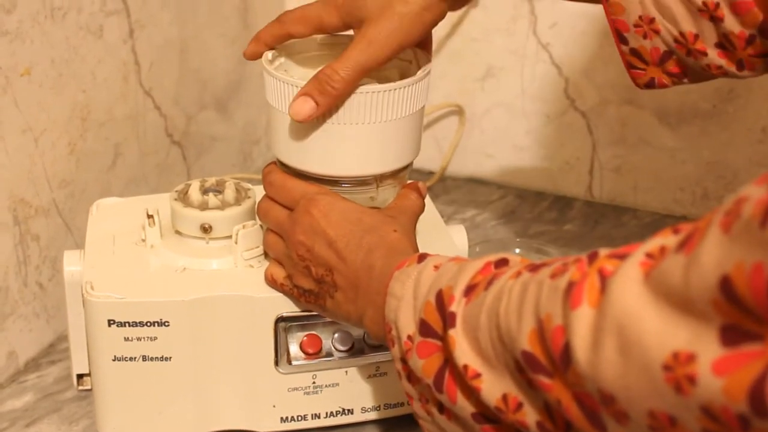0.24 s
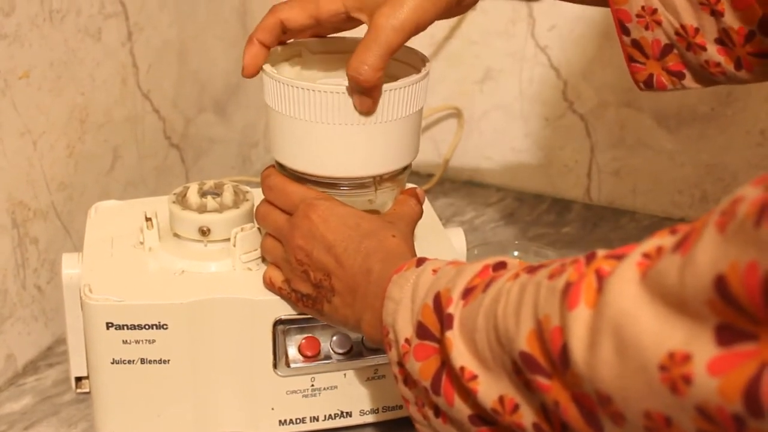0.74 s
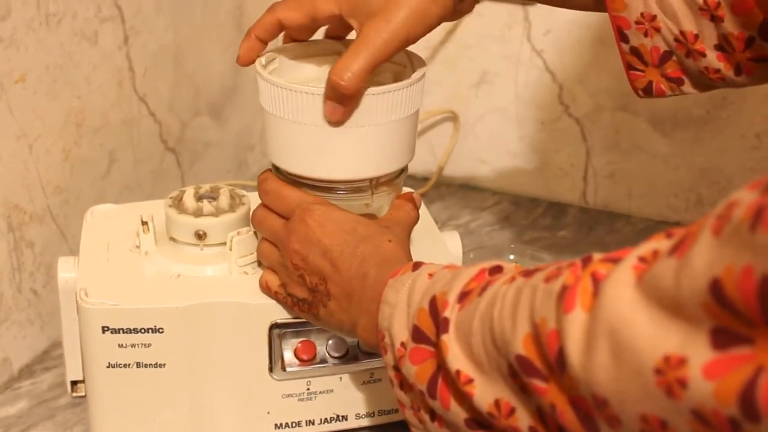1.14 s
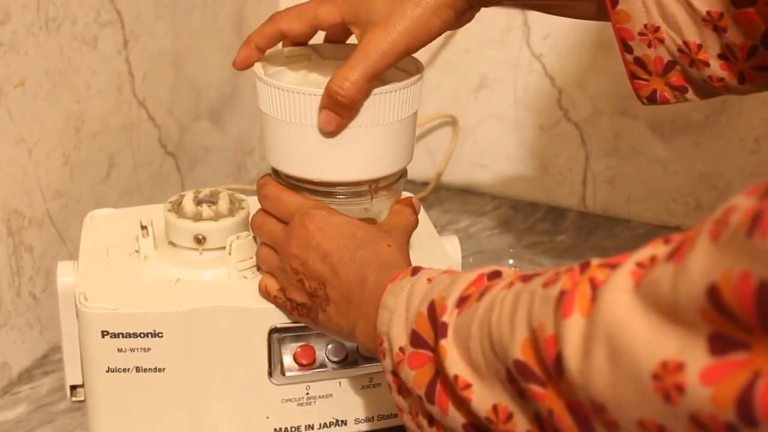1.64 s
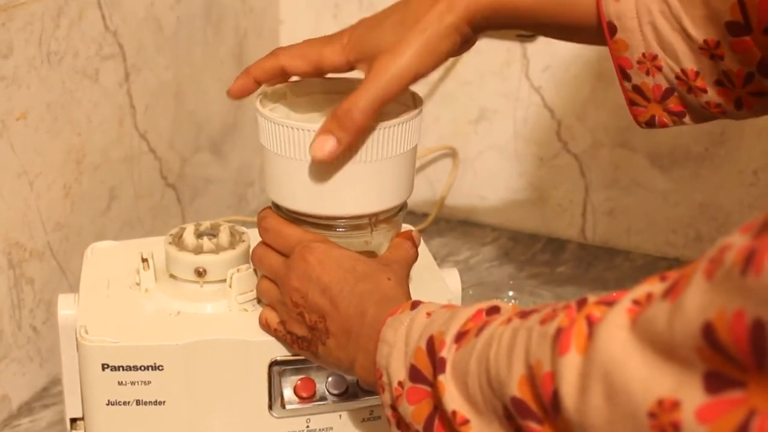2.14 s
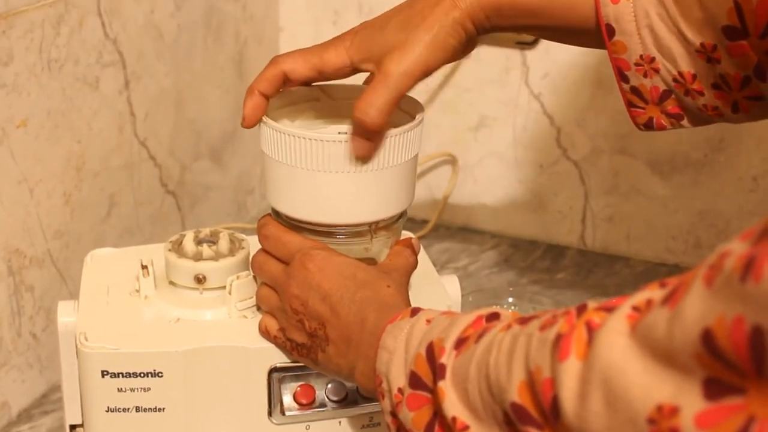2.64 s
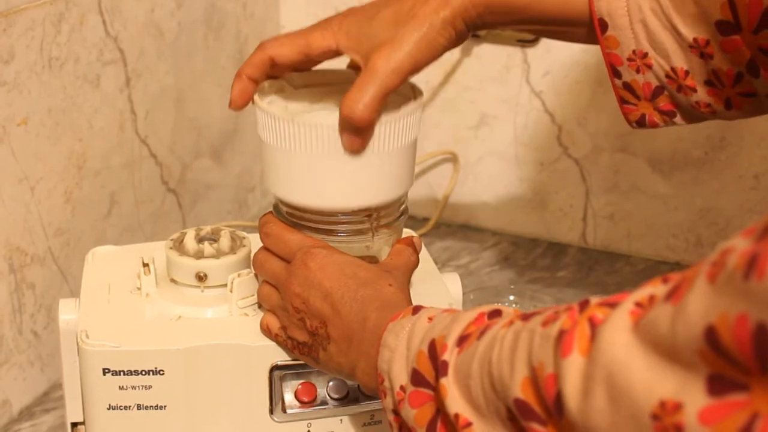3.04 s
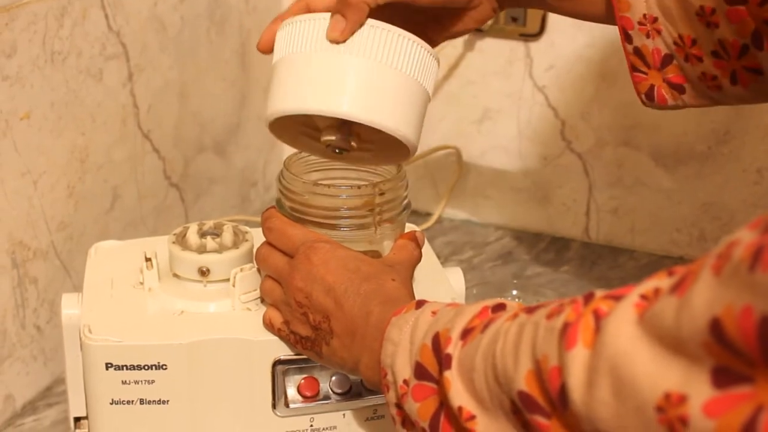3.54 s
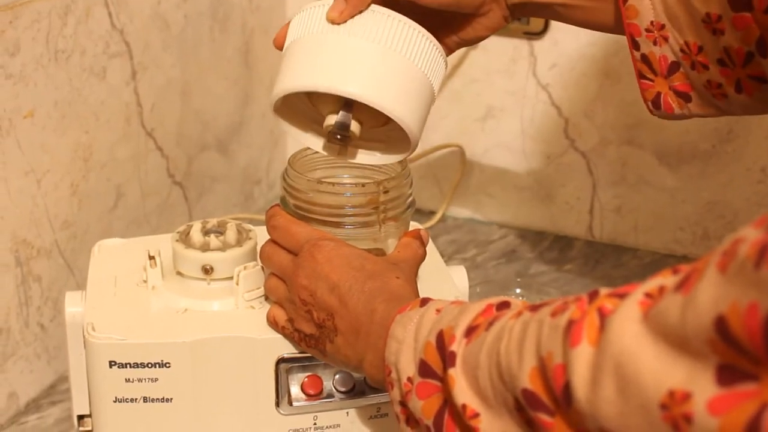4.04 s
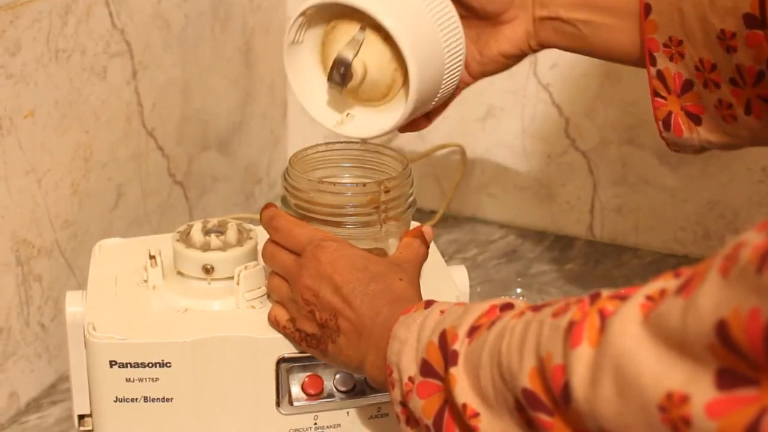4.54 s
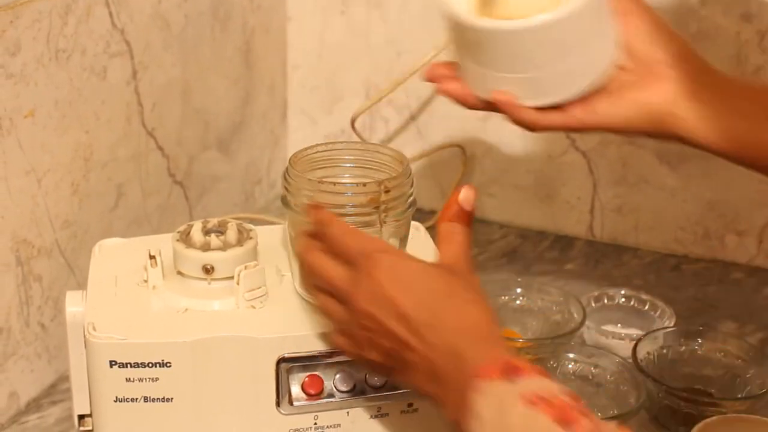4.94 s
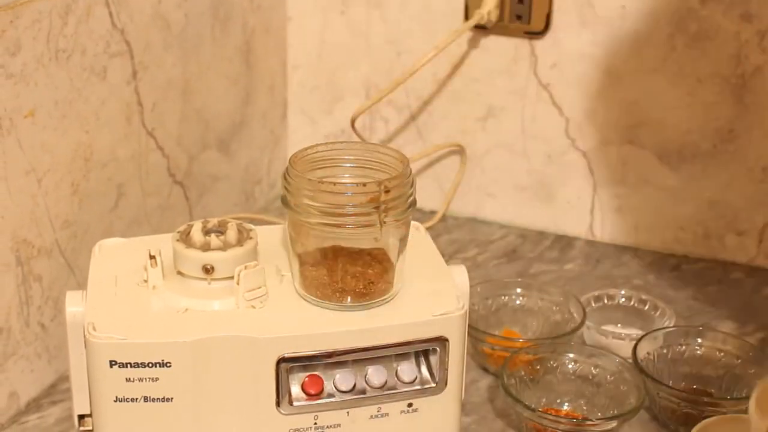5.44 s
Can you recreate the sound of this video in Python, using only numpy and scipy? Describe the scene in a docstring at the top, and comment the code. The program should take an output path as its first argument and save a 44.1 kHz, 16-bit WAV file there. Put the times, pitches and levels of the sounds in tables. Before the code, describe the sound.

Close stereo view in a small, hard, reverberant kitchen. A cricket chirps quietly throughout, about seven short high pulses a second near 5.4 kHz, over low room noise, faint hum and thin hiss. From 0 to 0.5 s a plastic lid on a glass jar gives small hollow knocks with low thumps and a gritty scrape at 0.1 s. Pairs and clusters of clacks follow at 0.8, 1.1-1.2 (strong), 1.4, 1.7, 2.1, 2.4 and 2.7 s, each with a softer rock back; brief rubs come at 0.5, 1.15 and 2.7, and a rim strike at 1.45. A loud flurry at 3.0-3.2 s frees the lid, leaving a thin glass ring. Four solid, ringing raps on the rim follow at 3.66, 3.85 (loudest, doubled), 4.04 and 4.24 s. Light ticks fall between 4.86 and 5.15, clearest at 4.94. Near 5.6 s a sleeve rubs very faintly, leaving cricket and room.

```python
"""A ribbed plastic grinder lid is unscrewed from a glass jar in a hard-walled kitchen, heard in stereo.
It knocks and scrapes in its thread at each new grip, and strikes the rim once on the way; then it comes
free and is rapped four times on the rim. The hand lets go of the jar and a sleeve rubs faintly.
Contacts are short forces that drive the modes of lid or jar, in the room's reverberation.
A cricket, a train of ticks ringing a wing, chirps steadily in the room over noise, hum and hiss."""
import sys
import numpy as np
from scipy import signal
from scipy.fft import rfft, irfft
from scipy.io import wavfile
from scipy.ndimage import uniform_filter1d

SR = 44100
rng = np.random.default_rng(int(sys.argv[2]) if len(sys.argv) > 2 else 0)


def waveform_to_disk(signal):
    """Save audio, clipped to [-1, 1], as 16-bit WAV at the path in sys.argv[1]."""
    frames = np.transpose(np.atleast_2d(signal))
    scaled = np.clip(frames, -1, 1) * 32767
    samples = np.round(scaled).astype(np.int16)
    wavfile.write(sys.argv[1], SR, samples)


N = 250488

# Modes of the lid closed over the jar. Each row: frequency in Hz, relative level in dB, t60 in seconds.
LID_MODES = [(148, -15, 1), (282.4, -12, 0.73), (328.4, -10.5, 0.24), (364.3, -2.5, 0.23), (375, 1, 0.061),
             (398, -10.5, 0.48), (433.4, -9, 1), (472, -10, 0.59), (688.4, -13, 0.48), (788, -5.5, 0.39),
             (1050, -10.5, 0.74), (1107, -7.5, 0.35), (1165, -10, 0.55), (1254, -10, 0.17),
             (2287, -10.5, 0.18), (2368, -18, 0.15), (3090, -20.5, 0.27), (3270, -23, 0.28)]


def undb(db):
    """Decibels to gain."""
    return 10 ** (np.asarray(db) / 20)


def unit(x):
    """Scale to unit energy per channel."""
    return x / np.sqrt(np.mean(np.sum(x ** 2, axis=-1)) + 1e-18)


def along(points, hz):
    """Read (Hz, value) points on a log-frequency axis."""
    point_hz, value = np.transpose(points)
    return np.interp(np.log(np.maximum(hz, 1)), np.log(point_hz), value)


def tint(x, points):
    """Weight the spectrum of a sound by (Hz, dB) points."""
    size = x.shape[-1]
    gain = undb(along(points, np.fft.rfftfreq(size, 1 / SR)))
    return irfft(rfft(x) * gain, size)


def response(points, size=2048):
    """Causal (minimum-phase) impulse response with the spectrum of (Hz, dB) points."""
    gain = undb(along(points, np.fft.rfftfreq(size, 1 / SR)))
    cepstrum = irfft(np.log(gain))
    # fold the cepstrum onto positive time, so the response starts at once
    cepstrum[1:size // 2] *= 2
    cepstrum[size // 2 + 1:] = 0
    return irfft(np.exp(rfft(cepstrum)))


def through(x, ir):
    """Pass a sound through a response, one row per channel."""
    return signal.fftconvolve(np.atleast_2d(x), np.atleast_2d(ir), axes=-1)[:, :N]


def add(track, s, x):
    """Mix x into the track from time s."""
    start = max(int(s * SR), 0)
    part = track[..., start:start + x.shape[-1]]
    part += x[..., :part.shape[-1]]


def ringing_mode(hz, t60, phase=0.0):
    """One second of a sine that falls by 60 dB in t60, at unit energy."""
    t = np.arange(SR) / SR
    return unit(np.sin(2 * np.pi * (hz * t + phase)) * np.exp(-np.log(1000) * t / t60))


def body(colour, modes, ring_db, room, build_s):
    """A broad crack carried by the room, and modes that build up and ring on."""
    t = np.arange(SR) / SR
    ring = sum(undb(db) * ringing_mode(hz, t60, phase=rng.random()) for hz, db, t60 in modes)
    ring = unit(ring * (1 - np.exp(-t / build_s)))
    crack = unit(through(response(colour), room)[:, :len(t)])
    return unit(crack + undb(ring_db) * ring)


def slips(size, rate, spread_db):
    """Tiny slips of uneven force at random moments, rate per second."""
    when, force = rng.random(size), rng.standard_normal(size)
    sign = rng.choice([-1, 1], size)
    return (when < rate / SR) * sign * undb(spread_db * force)


def contact_force(rattle_s, chatter_db, chatter_hz, push_hz):
    """A push, low-passed at push_hz, then high-passed chatter as the faces grind."""
    t = np.arange(SR // 10) / SR
    age = t / rattle_s
    chatter = unit(slips(len(t), rate=2900, spread_db=2.5) * np.sqrt(age) * np.exp(-age))
    chatter = signal.sosfilt(signal.butter(2, chatter_hz, "high", fs=SR, output="sos"), chatter)
    push = signal.sosfilt(signal.butter(1, push_hz, fs=SR, output="sos"), 1. * (t == 0))
    return undb(chatter_db) * chatter + push


def blows(table, ringing, thump_db, chatter_db, chatter_hz, push_hz, favour_db, detune):
    """Contact forces strike a ringing body; short ones clack harder, and the grip retunes it a little."""
    plain_rattle_s, clack_db_per_halving = 0.0034, 3.5
    out = np.zeros((2, N))
    taps = np.arange(SR * 3 // 4)
    for row, low_db in zip(table, np.broadcast_to(thump_db, len(table))):
        s, db, rattle_s, bright_db, favoured_hz = row
        force = contact_force(rattle_s, chatter_db, chatter_hz, push_hz)
        # the point of contact decides which modes are driven hardest
        force += undb(favour_db) * signal.lfilter(*signal.iirpeak(favoured_hz, 6, fs=SR), force)
        clack_db = clack_db_per_halving * np.log2(plain_rattle_s / rattle_s)
        hardness = response([(40, -5.5), (140, low_db), (380, -3.5), (1100, clack_db), (2800, bright_db)])
        pitch = 1 + detune * rng.standard_normal()
        held = [np.interp(taps * pitch, np.arange(len(x)), x) for x in ringing]
        add(out, s, undb(db) * through(through(force, hardness), held))
    return out


def rocking(rows):
    """The lid rocks back once after each knock, softer and duller."""
    delays = rng.uniform(.015, .05, len(rows))  # seconds
    return [(s + delay, db - 10, 0.0077, bright_db - 4.5, hz)  # the third is the rattle in seconds
            for (s, db, _, bright_db, hz), delay in zip(rows, delays)]


def lid_knocks(room):
    """The lid knocks in its thread and rocks back, ringing the closed jar and thumping the base."""
    # Knocks. Each row: start in seconds, level in dB, rattle in seconds, brightness in dB, favoured Hz.
    knock_rows = [(.003, -14, 0.0058, 0, 317), (.062, -9.5, .0025, 1.5, 368), (.086, -7, 0.0042, 5.5, 322),
                  (.196, -7, 0.00082, 3.5, 310), (.403, -4, 0.0016, -4, 360), (.472, -4.5, 0.0067, 6, 324),
                  (.799, -2, .004, -1, 340), (.848, -1.5, 0.0095, -6, 306), (1.080, 2.5, 0.003, -5, 353),
                  (1.189, 7, 0.0035, 1, 388), (1.385, -10, 0.0032, 7, 380), (1.427, -7.5, 0.013, 8, 380),
                  (1.636, -5, 0.021, -3.5, 373), (1.696, 0, 0.0056, -4, 384), (1.751, 0, 0.011, 3.5, 380),
                  (2.068, 1, 0.0059, 3, 482), (2.079, -2, 0.0024, 6, 494), (2.131, 2, .011, 7, 363),
                  (2.306, -3.5, 0.017, 0.5, 420), (2.354, 0.5, 0.012, -4.5, 420),
                  (2.419, -0.5, 0.0081, 6.5, 444), (2.440, -3, 0.0052, -3, 424),
                  (2.674, 4.5, 0.0026, 4.5, 410), (2.727, 0.5, 0.0036, 3.5, 358),
                  (2.973, 6, 0.0016, 0, 386), (3.092, 2.5, 0.0063, 7, 370), (3.142, 4.5, 0.0067, 3, 503),
                  (3.201, 0, 0.0054, 10, 356)]
    # Thump passed into the base, strong at the first grip and as the lid lifts.
    # Each row: time in seconds, level in dB.
    lid_thump = [(.09, 14), (.4, 7.5), (.8, 1), (1.19, -10), (1.75, -3.5), (2.07, 4.5), (2.42, 2),
                 (3.0, -12.5), (3.15, 12)]
    # Broad colour of the closed lid. Each row: frequency in Hz, level in dB.
    lid_colour = [(60, -42.5), (110, -15), (150, -9), (260, 0), (390, 7.5), (600, 0.5), (1150, -1),
                  (1800, -9.5), (2500, -9.5), (4000, -20), (7500, -27), (15000, -46)]
    lid = body(lid_colour, LID_MODES, ring_db=-0.5, room=room, build_s=0.002)
    twists = [*knock_rows, *rocking(knock_rows)]
    thumps = np.interp([row[0] for row in twists], *np.transpose(lid_thump))
    return blows(twists, lid, thump_db=thumps, chatter_db=-2, chatter_hz=1460, push_hz=3880,
                 favour_db=1.5, detune=0.012)


def scrapes(room):
    """Plastic rubs on the thread, and at last a sleeve, in swells of dense slips."""
    # Rubs. Each row: middle in seconds, length in seconds, level in dB, brightness in dB.
    scrape_rows = [(0.136, .1, 3.5, -2), (0.501, 0.073, -5, -4), (1.152, 0.058, -7.5, 2),
                   (2.713, 0.047, -1.5, -1.5), (3.135, .05, 0.5, 0), (5.634, 0.33, -31.5, 21)]
    # Broad colour of the rubs. Each row: frequency in Hz, level in dB.
    scrape_colour = [(50, -23), (140, -5.5), (350, 10), (600, -1), (1150, -0.5), (2500, 1.5), (4200, -2.5),
                     (8000, -12), (11000, -19.5), (15000, -33)]
    force = np.zeros(N)
    t = np.arange(SR // 2) / SR
    for s, length, db, bright_db in scrape_rows:
        swell = np.sin(np.pi * np.minimum(t / length, 1)) ** 2
        rub = unit(slips(len(t), rate=2500, spread_db=7.5) * swell)
        tilt = response([(500, -bright_db), (4000, bright_db)])
        add(force, s - length / 2, undb(db) * through(rub, tilt)[0])
    return through(force, body(scrape_colour, LID_MODES, ring_db=-4.5, room=room, build_s=0.0012))


def rim_raps(room):
    """The lid strikes the glass rim, ringing the open jar and shaking the base below."""
    # Strikes. Each row: start in seconds, level in dB, rattle in seconds, brightness in dB, favoured Hz.
    rap_rows = [(1.447, 6.8, 0.0037, -2.5, 298), (3.658, 3.9, 0.0032, -1, 293),
                (3.845, 9.36, 0.0061, 2, 267), (3.860, 5.4, 0.0016, -3.5, 298),
                (4.035, 7.35, 0.0057, -0.5, 254), (4.242, 5.8, .0041, -3.5, 460)]
    # Modes of the open jar on its hollow base. Each row: frequency in Hz, level in dB, t60 in seconds.
    jar_modes = [(126.5, -14, 0.8), (146, -9, 0.76), (178, -11, 0.72), (278.2, -3.5, 0.68),
                 (296, -2.5, 0.58), (357, -2, 0.63), (468.5, -1, 0.13), (574, -4, .22), (714, -2.5, 0.3),
                 (1147, -11, 0.43), (1240, -5.5, 0.19), (1656, -2, 0.092), (1814, -31, 0.25),
                 (2270, -5, 0.25), (3256, -8, 0.3)]
    # Broad colour of the open jar. Each row: frequency in Hz, level in dB.
    jar_colour = [(50, -32), (90, -15.5), (125, -10.5), (300, 1), (700, -2), (1500, -5.5), (3200, -8),
                  (4200, -13), (7000, -17.5), (11000, -25.5), (15500, -38)]
    jar = body(jar_colour, jar_modes, ring_db=-4.0, room=room, build_s=0.005)
    return blows(rap_rows, jar, thump_db=3, chatter_db=2.5, chatter_hz=465, push_hz=1010,
                 favour_db=6, detune=0.00722)


def pings():
    """The glass rings after a touch, one mode each time: first long, then short."""
    # Touches. Each row: start in seconds, frequency in Hz, level in dB, t60 in seconds.
    ping_rows = [(3.201, 2900, -13.5, .55), (4.038, 2270, -2, 0.14)]
    glass = np.zeros(N)
    for s, hz, db, t60 in ping_rows:
        add(glass, s, undb(db) * ringing_mode(hz, t60))
    return glass


def settling(room):
    """The jar ticks as the hand leaves it: small blows coloured by its foot and the room."""
    # Ticks. Each row: start in seconds, level in dB, rattle in seconds, brightness in dB, favoured Hz.
    tick_rows = [(4.857, -27.5, .004, -1, 1900), (4.938, -5, 0.0053, 1, 1420),
                 (5.024, -20.5, 0.0019, -0.72, 1170), (5.153, -22, 0.0046, -2, 1830)]
    # Broad colour of the foot. Each row: frequency in Hz, level in dB.
    tick_colour = [(70, -35), (250, 3.5), (700, 1.5), (1250, 1), (1900, 4), (2800, -4.5), (4500, -12),
                   (9000, -18), (15000, -40)]
    foot = unit(through(response(tick_colour), room))
    return blows(tick_rows, foot, thump_db=-9, chatter_db=-4.5, chatter_hz=800, push_hz=2480,
                 favour_db=1.0, detune=0.0316)


def off_centre(pair):
    """The jar stands a little off centre: its sound reaches the right microphone later."""
    lag_s = 1.5e-5  # a fraction of a sample, so turn the phase instead
    turn = np.exp(-2j * np.pi * np.fft.rfftfreq(N, 1 / SR) * lag_s)
    return np.array([pair[0], irfft(rfft(pair[1]) * turn, N)])


def cricket(level_db=-46.0, length_s=0.079, catch_hz=300, scatter_db=0.5, jitter=.25, sag_hz=120, grow_db=4.5):
    """The file catches in uneven ticks that ring the wing; each chirp swells late and sags in pitch."""
    # Resonance of the wing. Each row: frequency in Hz, level in dB.
    wing = [(2500, -74), (4700, -22.5), (5100, -7.5), (5420, 7), (5750, -0.5), (6120, -11.5), (6400, -34),
            (9000, -65)]
    first_chirp_s, period_s, chirp_scatter_s = -.035, .14075, 0.0022
    lead = SR // 10  # samples ahead: it is already singing at the start
    ticks = np.zeros((2, N + 2 * lead))  # wing open, wing closed
    for beat in np.arange(first_chirp_s, N / SR - length_s / 2, period_s):
        s = beat + chirp_scatter_s * rng.standard_normal()
        gap, force = rng.standard_normal(size=(2, 48))
        # progress of each tick through the stroke, 0 to 1
        stroke = np.minimum(np.cumsum(np.exp(jitter * gap)) / catch_hz / length_s, 1)
        swell = np.abs(np.sin(np.pi * stroke)) ** 0.59
        swell *= undb(grow_db * stroke + scatter_db * force)
        when = lead + (s + stroke * length_s) * SR
        ticks[:, when.astype(int)] += swell * np.array([1 - stroke, stroke])
    song = 0
    for x, shift in zip(ticks, (sag_hz / 2, -sag_hz / 2)):
        song = song + signal.fftconvolve(x, response([(hz + shift, db) for hz, db in wing]))
    # the room smears the chirps
    room = kitchen(direct_db=-8, early_db=7, early_s=.013)
    heard = signal.fftconvolve(song[None], room, axes=-1)[:, lead:lead + N]
    return undb(level_db) * np.sqrt(N) * unit(heard)


def kitchen(direct_db, early_db, early_s):
    """Direct sound, close reflections off counter and walls, then a tail that dulls as it dies."""
    # Reverberation of the kitchen. Each row: frequency in Hz, t60 in seconds.
    room_t60 = [(120, 1), (300, 0.76), (800, 0.66), (2000, 0.54), (5000, 0.45), (13000, 0.36)]
    hz, s, cells = signal.stft(diffuse(SR), SR, nperseg=256)
    decay = undb(-60 * s / along(room_t60, hz)[:, None])
    tail = signal.istft(cells * decay, SR)[1]
    t = np.arange(tail.shape[1]) / SR
    ir = unit(tail * (1 + undb(early_db) * np.exp(-t / early_s)))
    ir[:, 0] += undb(direct_db)
    return unit(even(even(ir, size=50), size=50))


def even(x, size):
    """Level out a response's broad humps and dips, keeping its fine comb."""
    spectrum = rfft(x, 2 * x.shape[1])
    power = uniform_filter1d(np.mean(np.abs(spectrum) ** 2, axis=0), size)
    return irfft(spectrum / np.sqrt(power))[:, :x.shape[1]]


def diffuse(size):
    """Noise from all sides: alike in both channels where side is weak, less related where it is strong."""
    # Side against mid. Each row: frequency in Hz, side level in dB.
    room_width = [(30, -3), (100, 0), (280, -14), (1000, -8.5), (2000, -3.5), (5000, -4.5), (12000, 1)]
    mid, side = rng.standard_normal((2, size))
    pair = mid + np.array([[1], [-1]]) * tint(side, room_width)
    # take back the power that the side signal added
    return tint(pair, [(hz, -10 * np.log10(1 + undb(db) ** 2)) for hz, db in room_width])


def background(low_db=-58, treble_db=-66, hum_hz=148, hum_db=-71):
    """Quiet room noise and a thin hiss, both tinted diffuse noise, and a faint sine hum."""
    # Room noise. Each row: frequency in Hz, relative level in dB per Hz.
    hush = [(15, -51), (25, -22), (115, -8.5), (146, -10.5), (186, -11.5), (314, -9.5), (350, -11),
            (476, -7.5), (508, -18), (660, -13), (1190, -17.5), (4600, -22), (5980, -41), (10100, -120)]
    # Hiss. Each row: frequency in Hz, relative level in dB per Hz.
    hush_treble = [(25, -60), (3000, -54), (4800, -13.5), (7500, -10.5), (11000, -12), (15500, -21)]
    low = unit(tint(diffuse(N), hush))
    treble = unit(tint(diffuse(N), hush_treble))
    hum = unit(np.sin(2 * np.pi * hum_hz * np.arange(N) / SR))
    return np.sqrt(N) * (undb(low_db) * low + undb(treble_db) * treble + undb(hum_db) * hum)


def scene():
    """Lid, jar, sleeve and cricket in the same room."""
    closed = kitchen(direct_db=-7.0, early_db=-4, early_s=0.042)
    opened = kitchen(direct_db=-11.0, early_db=6, early_s=0.058)
    lid = lid_knocks(closed)
    rubs = scrapes(closed)
    jar = rim_raps(opened) + pings() + settling(opened)
    return off_centre(lid + rubs + jar) + cricket() + background()


def record(dry):
    """Two slightly unequal microphones and a steep top cut."""
    # The right microphone hears more bass. Each row: frequency in Hz, left minus right in dB.
    mic_balance = [(50, -2.5), (400, -4.5), (1200, -2.5), (2500, -1.8), (4500, 0.6), (14000, -0.5)]
    pair = [tint(x, [(hz, side * db / 2) for hz, db in mic_balance]) for x, side in zip(dry, (1, -1))]
    top_cut = signal.ellip(10, .1, 80, 15600, fs=SR, output="sos")  # ripple dB, stopband dB, edge Hz
    return signal.sosfilt(top_cut, pair)


dry = scene()
out = record(dry)
waveform_to_disk(out)
```